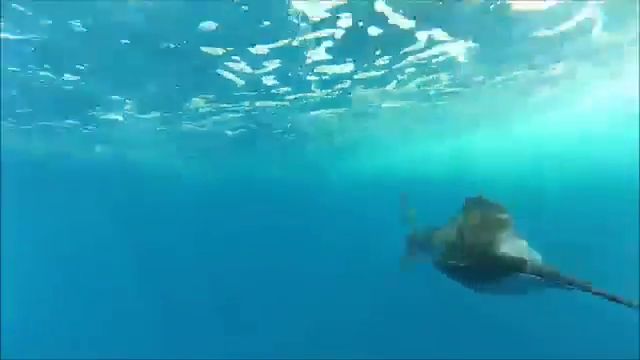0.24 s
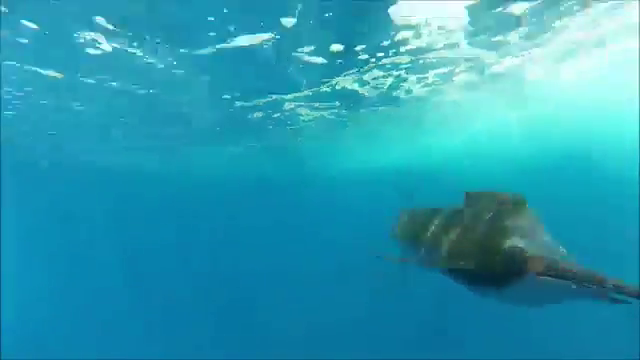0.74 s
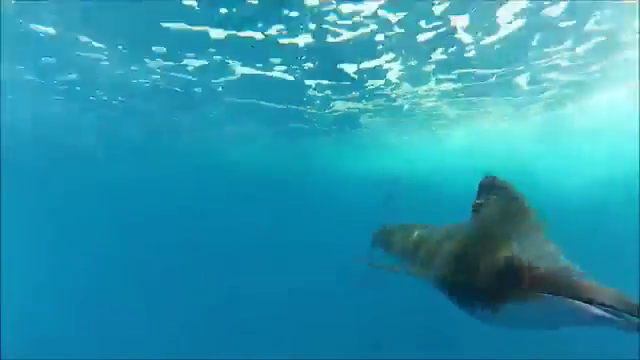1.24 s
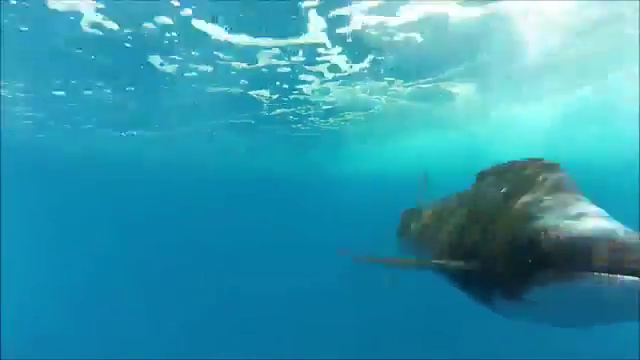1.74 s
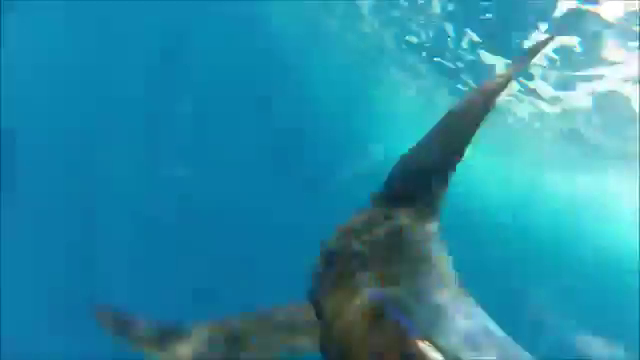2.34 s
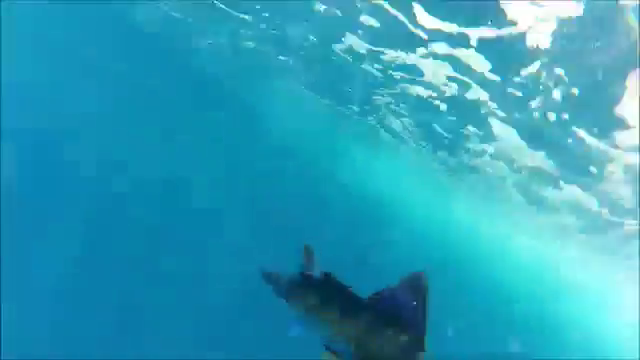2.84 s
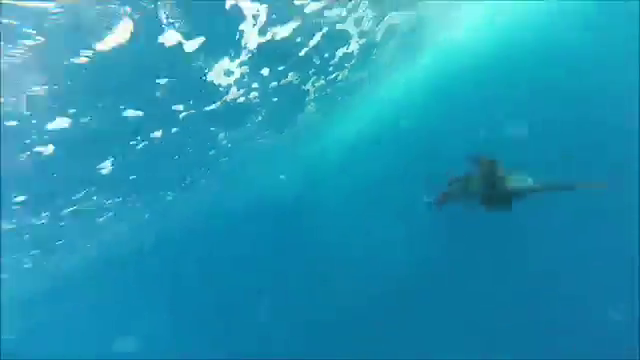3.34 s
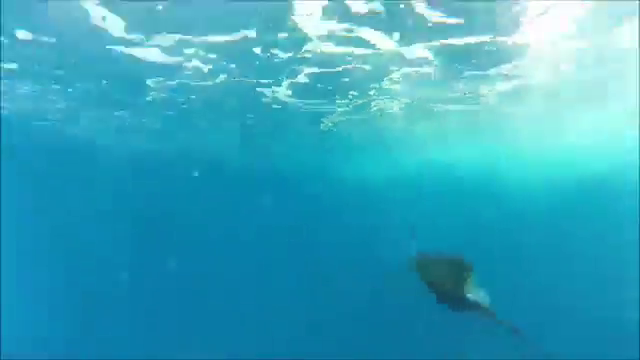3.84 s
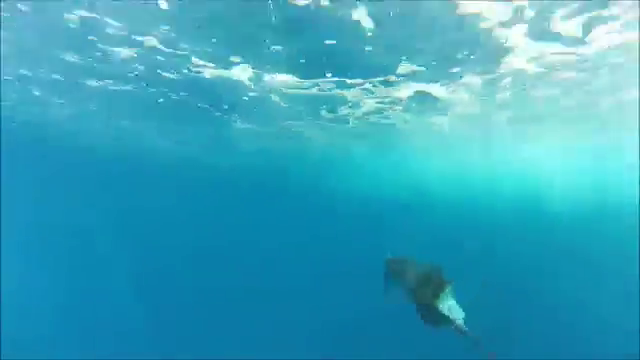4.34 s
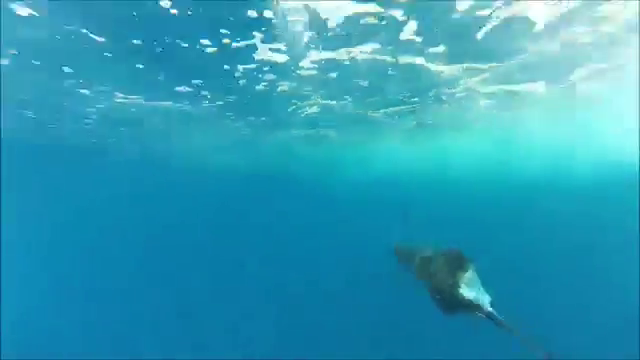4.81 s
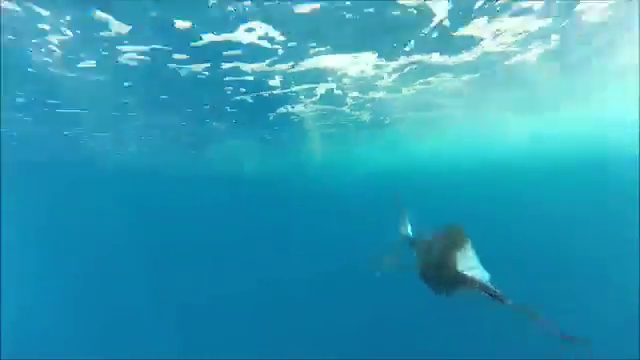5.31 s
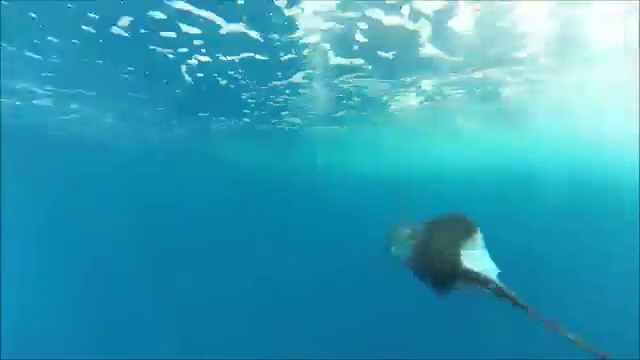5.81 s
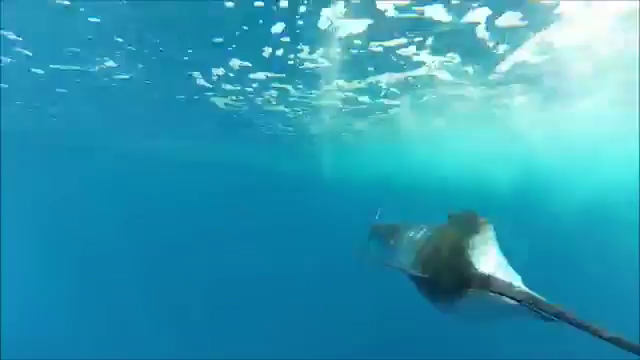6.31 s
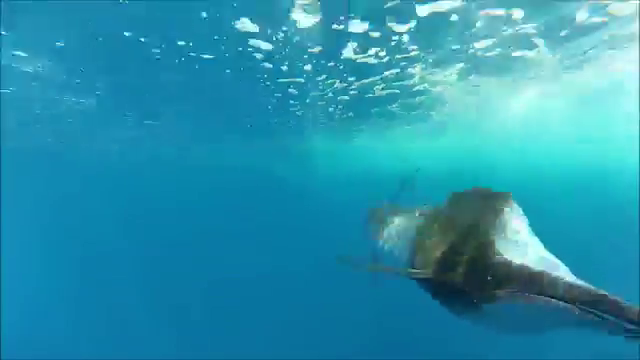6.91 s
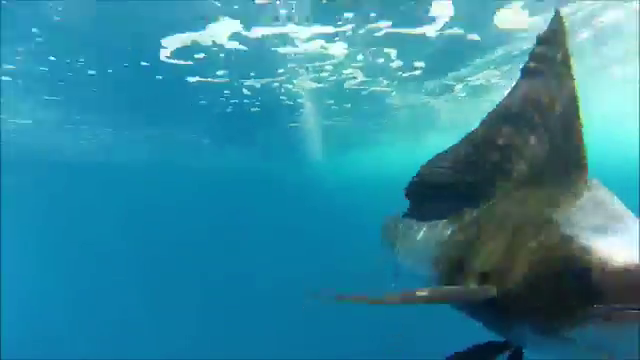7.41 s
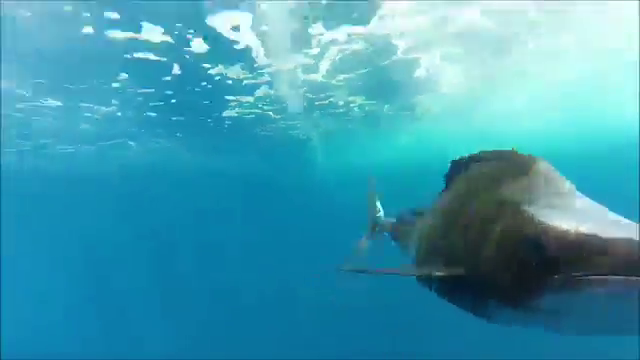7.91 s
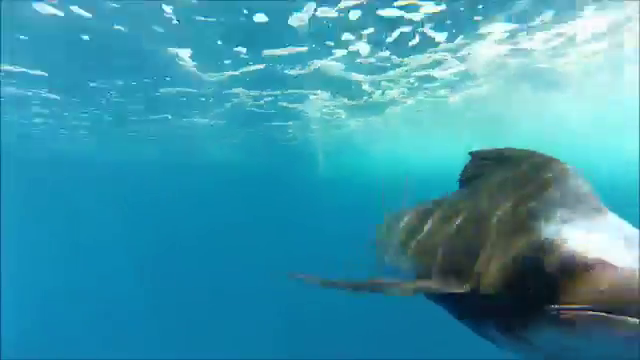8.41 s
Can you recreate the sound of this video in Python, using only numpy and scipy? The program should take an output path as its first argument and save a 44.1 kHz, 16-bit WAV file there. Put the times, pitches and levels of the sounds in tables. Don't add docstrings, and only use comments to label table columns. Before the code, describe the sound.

From 0 s, a sealed camera towed under the surface picks up a very low engine throb, around 50 hertz, swelling in uneven pulses, with a hollow housing hum near 200 hertz coming and going. Lumpy, muffled water buffets the shell, with a thin wash above and faint crackle on the loudest swells. At about 2.2 s a billfish hits the housing: an extremely loud, clipped crack with a fast upward snap, then irregular hard knocks, dull thuds and a light scraping hiss until about 2.4 s. The flow drops away until roughly 2.7 s, leaving low rumble and tiny ticks. Rushing returns, with scattered high bubble pips and little puffs of fizz until about 3.9 s. From then to 8.6 s the drone, hum and gusting flow continue, uneven but unbroken, with no further strikes.

```python
import sys
import numpy as np
from scipy import signal
from scipy.fft import rfft, irfft, next_fast_len
from scipy.io import wavfile
from scipy.ndimage import uniform_filter1d, map_coordinates

SR = 44100
rng = np.random.default_rng(int(sys.argv[2]) if len(sys.argv) > 2 else 0)


def how_loud(loudness_db):
    steps = np.asarray(loudness_db, float) / 20
    return 10 ** steps


def wrap_up_sound(samples):
    columns = np.atleast_2d(samples).T
    tamed = np.clip(columns, -1, 1)
    steps = np.round(tamed * 32767).astype(np.int16)
    wavfile.write(sys.argv[1], SR, steps)


N = 381906

# (start [s], length [s], level [dB], pitch [Hz])
RIG_SWINGS = [(-0.005, .3, -15.5, 47.24), (0.67, .26, -13.5, 47.8), (1.03, .155, -15.5, 50.4),
              (1.3, .17, -15, 50.2), (1.51, .09, -16.5, 51.7), (1.7, .11, -13, 50.4),
              (1.905, .31, -15, 50.1), (2.5, .2, -15, 50.38), (2.79, .155, -15.5, 46.4),
              (3.075, .19, -16.5, 43.75), (3.3, .14, -15, 51.7), (3.485, .21, -15, 50.4),
              (3.87, .34, -13.5, 48.4), (4.225, .16, -15.5, 46.5), (4.43, .23, -13, 48.86),
              (4.75, .32, -16.5, 48.3), (5.1, .11, -14.5, 49.12), (5.245, 0.19, -15, 51.85),
              (5.59, .22, -15, 49.1), (5.835, .13, -20, 53.5), (5.985, .075, -18, 46.6),
              (6.245, .26, -15, 47.8), (6.545, .14, -14, 51.72), (6.705, .1, -15, 50.82),
              (6.85, .29, -13, 48.94), (7.25, .3, -16.5, 52.17), (7.6, .14, -12.5, 51.43),
              (7.9, .13, -16.5, 45.1), (8.09, .2, -17, 48.6), (8.33, .33, -14, 47.96)]
# (start [s], length [s], level [dB], pitch [Hz])
HOUSING_HUM = [(0.065, 0.083, -23, 200.6), (0.269, 0.041, -26, 197.2), (0.332, 0.048, -19, 200.6),
               (0.402, 0.19, -15.5, 200.6), (0.635, 0.055, -22.5, 205.7), (0.742, 0.069, -25, 205.2),
               (0.967, 0.103, -16, 203.5), (1.1, 0.29, -18.5, 201.2), (1.441, 0.026, -25.5, 198.4),
               (1.496, 0.28, -16.5, 203.3), (1.81, 0.45, -19, 201.0), (2.297, 0.037, -20.5, 199),
               (2.788, 0.042, -24, 203.3), (2.934, 0.41, -18, 202.6), (3.363, 0.16, -15, 203.5),
               (3.62, 0.141, -19.5, 196), (3.802, 0.12, -15, 194.9), (3.991, 0.041, -25, 195.8),
               (4.246, 0.175, -20, 199.8), (4.646, 0.3, -21.5, 200.2), (4.986, 0.33, -19, 200.2),
               (5.331, 0.96, -19.5, 201.1), (6.377, 0.059, -23.5, 189), (6.478, 0.123, -16.5, 202),
               (6.845, 0.069, -17.5, 205.1), (6.943, 0.51, -20.5, 198.3), (7.471, 0.23, -17.5, 202.1),
               (7.767, 0.56, -22.5, 202.8), (8.359, 0.061, -22.5, 200.8), (8.624, 0.034, -17.5, 198.5)]
# (pitch [Hz], width [Hz], level [dB])
SKIRTS = [(50, 30, -30.5), (192.2, 33, -30.5), (397.4, 32, -39.5), (24.4, 6.8, -30.5), (915.3, 32, -58.5),
          (2230, 610, -71)]
# (time [s], start pitch [Hz], stiffening [Hz/s], level [dB], t60 [s])
BLOW = [
    (2.21995, 335, 15700, 34, .0125),
    (2.2222, 800, 0, 0, .02),
    (2.2250, 1900, 0, -14, .015),
]
# (time [s], peak [dB], thud re knock [dB], snap re knock [dB])
BOUNCES = [
    (2.2309, -34, 17.5, -23.5),
    (2.2627, -11, 2, -6),
    (2.2968, -26.5, 11.5, -9),
    (2.329, -13.5, 1.5, -13),
    (2.333, -11, -3, -22),
    (2.358, -26.5, -2, -16),
    (2.369, -38.5, 22.5, -10),
    (2.376, -46, 23, 7),
    (2.417, -41, -3.5, -2.5),
]
# (pitch [Hz], level [dB], t60 [s])
SHELL_MODES = [(597, 2, 0.016), (877, 2.5, 0.028), (1216, -6, 0.022), (1570, -3.5, 0.0083),
               (2300, -10, 0.011)]
# (pitch [Hz], level [dB], t60 [s])
THUD_MODES = [(222, 1, 0.043), (425, 0.048, 0.034)]
# (time [s], peak [dB], pitch [Hz])
BUBBLES = [(2.301, -52, 6207), (2.311, -57, 5740), (2.327, -52, 5640), (2.334, -55, 7350),
           (2.36, -49, 5780), (2.398, -47.5, 10570), (2.449, -59, 6276), (2.614, -49.5, 5344),
           (2.636, -52, 5510), (2.71, -51, 7740), (2.716, -52, 8270), (2.737, -56, 6290),
           (2.762, -55, 8270), (2.83, -45.5, 10280), (2.872, -44, 5790), (2.904, -55, 5440),
           (2.919, -43, 5480), (2.927, -56, 4950), (2.941, -43.5, 5710), (2.955, -46, 8690),
           (3.066, -40.5, 7120), (3.145, -44, 10260), (3.249, -38, 7230), (3.257, -57, 7140),
           (3.266, -59, 7350), (3.563, -68, 4840), (3.602, -47, 10130), (3.635, -49.5, 6510),
           (3.832, -38, 4765), (3.838, -41, 8254)]
# (time [s], peak [dB], rise [dB/s], fall [dB/s])
FIZZ = [
    (2.34, -64, 200, 60),
    (2.9, -58.5, 50, 100),
    (3.09, -57.5, 200, 40),
    (3.85, -59, 200, 100),
]
# (time [s], level [dB])
FLOW = [(0.0, -52), (0.24, -56.5), (0.55, -47.5), (0.85, -56.5), (1.15, -50.5), (1.7, -48.5), (2.15, -54),
        (3.0, -48.5), (3.4, -50.5), (3.8, -49), (4.1, -53), (4.6, -55.5), (4.85, -50), (5.8, -51.5),
        (6.28, -46), (6.65, -52), (7.4, -49), (8.66, -54)]
# (time [s], level [dB])
GUSTS = [(0.68, 1), (1.42, -4), (3.2, 3), (3.85, 4), (4.38, 4), (5.35, 2), (6.42, 4), (7.05, -2), (7.28, 2),
         (7.74, -4.5), (7.92, 1.5), (8.3, 4.5)]
# (frequency [Hz], level [dB per Hz])
SURGE_SPECTRUM = [(8, -10), (18, -2), (30, 3.5), (65, 7.5), (90, -6), (160, 1), (240, -2), (310, -12),
                  (400, -11.5), (500, -9.5), (600, -29), (800, -57)]
# (frequency [Hz], level [dB per Hz])
WASH_SPECTRUM = [(400, -27.5), (620, -6.5), (730, 1.5), (850, -5), (925, -3.5), (1060, -12), (1240, -9),
                 (1530, -13), (1950, -22.5), (2240, -23.5), (2600, -28.5), (3500, -30.5), (8000, -41.5),
                 (15000, -48)]
# (first [s], level [dB], steps [count])
GAIN_STEPS = [(0.109, -52, 4), (0.19, -53, 2), (0.437, -43, 1), (0.703, -41, 1), (0.806, -48, 1),
              (1.06, -48, 2), (1.366, -51, 2), (1.543, -50, 1), (1.573, -44, 2), (1.723, -50, 1),
              (2.034, -50, 2), (2.807, -49, 2), (2.989, -48, 1), (3.174, -43, 2), (3.325, -49, 3),
              (3.628, -50, 1), (3.869, -43, 1), (4.449, -49, 3), (5.121, -50, 2), (5.296, -48, 2),
              (5.431, -46, 1), (5.917, -47, 1), (6.326, -49, 2), (6.417, -47.5, 2), (6.578, -42, 1),
              (7.07, -48, 2), (7.505, -49, 2), (7.622, -46.5, 1), (7.945, -49, 2), (8.377, -48, 1)]
# (first [s], steps [count])
FAINT_STEPS = [(0.553, 1), (0.828, 1), (1.225, 2), (1.347, 1), (1.527, 1), (1.743, 1), (1.763, 1),
               (1.918, 2), (1.991, 1), (2.067, 2), (2.937, 1), (3.093, 2), (3.49, 2), (3.913, 1),
               (3.946, 1), (4.0, 1), (4.041, 1), (4.09, 1), (4.26, 2), (4.816, 2), (4.915, 2), (5.608, 2),
               (6.017, 1), (6.272, 2), (6.875, 2), (7.006, 1), (7.569, 1), (7.672, 2), (8.119, 2),
               (8.269, 1)]
# (frequency [Hz], level [dB per Hz])
CRACKLE_SPECTRUM = [(500, -26.5), (1100, 2), (2200, -0.5), (3700, -7.5), (8000, -13.5), (13500, -17.5),
                    (15300, -41.5)]


def unit(x):
    return x / np.sqrt(np.mean(x ** 2) + 1e-20)


def curves(rows):
    s, *cols = np.transpose(rows)
    return [np.interp(np.arange(N) / SR, s, c) for c in cols]


def wobble(rate):
    knots = rng.standard_normal(int(N * rate / SR) + 4)
    return map_coordinates(knots, [np.arange(N) * rate / SR])


def filtered(x, response):
    m = next_fast_len(N + SR // 2)
    return irfft(rfft(x, m) * response(np.fft.rfftfreq(m, 1 / SR)), m)[:N]


def coloured(points):
    f, db = np.transpose(points)

    def response(hz):
        return how_loud(np.interp(np.log(hz + 1), np.log(f), db, -120, -120))

    return unit(filtered(rng.standard_normal(N), response))


def add(track, s, sound):
    part = track[int(round(s * SR)):][:len(sound)]
    part += sound[:len(part)]


def gate(t, length_s, rise_s, fall_s):
    return (1 + np.tanh(t / rise_s)) * (1 - np.tanh((t - length_s) / fall_s)) / 4


def spells(rows, rise_s, fall_s, sag_db_per_s, lift_db, rest_db):
    t = np.arange(0, N / SR, .002)[:, None]
    s, length_s, db, hz = np.transpose(rows)
    middle = s + length_s / 2
    level_db = db + lift_db + sag_db_per_s * np.clip(t - middle, -length_s, length_s)
    gain = np.sum(how_loud(level_db) * gate(t - s, length_s, rise_s, fall_s), axis=1) + how_loud(rest_db)
    return curves(np.c_[middle, hz]) + curves(np.c_[t, gain])


def resonance(spell, waver_hz, flutter_db, rate):
    hz, gain = spell
    phase = 2 * np.pi * np.cumsum(hz + waver_hz * wobble(rate)) / SR
    return np.sqrt(2) * gain * how_loud(flutter_db * wobble(rate)) * -np.cos(phase)


def tow_rig():
    swings = spells(RIG_SWINGS, rise_s=.007, fall_s=.02, sag_db_per_s=-7, lift_db=-2.5, rest_db=-30.5)
    return resonance(swings, waver_hz=2, flutter_db=1.1, rate=18)


def housing(surge_swing_db):
    hum = spells(HOUSING_HUM, rise_s=.017, fall_s=.022, sag_db_per_s=-1.5, lift_db=-3, rest_db=-37)
    return resonance(hum, waver_hz=5, flutter_db=2.5, rate=30) * how_loud(.3 * surge_swing_db)


def drone(surge_db):
    surge_swing_db = surge_db - surge_db.mean()
    x = tow_rig() + housing(surge_swing_db)
    for hz, width, db in SKIRTS:
        def response(f):
            return (f * width / np.hypot(hz * hz - f * f, f * width)) ** 2

        skirt = unit(filtered(rng.standard_normal(N), response))
        x += how_loud(db + (hz > 100) * surge_swing_db) * skirt
    return x


def ring(modes, t):
    return sum(how_loud(db + rng.normal(0, 2.2) - 60 * t / t60) * np.sin(2 * np.pi * hz * t)
               for hz, db, t60 in modes)


def blow(x, t):
    grip = np.exp(-(t / .0082) ** 10)
    for s, hz, stiffen, db, t60 in BLOW:
        cycles = hz * t + stiffen * t * t / 2
        add(x, s, -grip * how_loud(db - 60 * t / t60) * np.sin(2 * np.pi * cycles))


def bounces(x, t):
    snap_band = signal.butter(3, [900, 2800], "band", fs=SR, output="sos")
    for s, db, thud_db, snap_db in BOUNCES:
        snap = signal.sosfilt(snap_band, rng.standard_normal(len(t)))
        knock = ring(SHELL_MODES, t) + how_loud(thud_db) * ring(THUD_MODES, t)
        knock += how_loud(snap_db + 13 - 60 * t / .016) * snap
        add(x, s, how_loud(db) * knock * (1 - np.exp(-t / .00096)))


def scrape():
    since = np.clip(np.arange(N) / SR - BLOW[0][0], 0, None)
    sliding = (since > .026) * (since < .165)
    return sliding * how_loud(-58.5 - 20 * since + 2.4 * wobble(81)) * coloured(CRACKLE_SPECTRUM)


def strike():
    x, t = np.zeros(N), np.arange(SR // 8) / SR
    blow(x, t)
    bounces(x, t)
    return x + scrape()


def pop(hz, t60):
    t = np.arange(SR // 60) / SR
    return how_loud(-60 * t / t60) * (1 - np.exp(-t / .00025)) * np.sin(2 * np.pi * hz * t * (1 + 4.3 * t))


def bubbles():
    x = np.zeros(N)
    for s, db, hz in BUBBLES:
        overtone = .25 * pop(1.6 * hz % 15000, .005)
        add(x, s, how_loud(db + 9) * (pop(hz, .0075) + overtone))
    place, pitches, sizes = rng.random((2600, 3)).T
    when = 2.28 + 1.82 * place
    clouds = sum(how_loud(db - np.maximum(rise * (at - when), fall * (when - at))) for at, db, rise, fall in FIZZ)
    for s, cloud, pitch, size in zip(when, clouds, pitches, sizes):
        add(x, s, cloud * how_loud(-4 * np.log(size + .01)) * pop(4500 * 3.1 ** pitch, .0045))
    return x


def flow():
    t, (flow_db,) = np.arange(N) / SR, curves(FLOW)
    lull = gate(t - 2.39, length_s=.33, rise_s=.04, fall_s=.08)
    flow_db = flow_db - 14.5 * lull + .43 * wobble(5.5)
    gust_s = .07
    flow_db += sum(db * np.exp(-((t - s) / gust_s) ** 2) for s, db in GUSTS)
    surge_over_db, surge_grows = 15.5, 1
    surge_db = flow_db.mean() + surge_over_db + surge_grows * (flow_db - flow_db.mean())
    return surge_db, flow_db


def water(surge_db, wash_db):
    eddy = wobble(14)
    surge = how_loud(surge_db + 12 + 2.2 * eddy + 1.4 * wobble(45)) * coloured(SURGE_SPECTRUM)
    wash = how_loud(wash_db + 1 + 1.3 * eddy + 1.3 * wobble(70)) * coloured(WASH_SPECTRUM)
    return surge + wash


def steps(x):
    gap_s, loss_db, faint_db, stray_db = .011, 4, -54, -52
    rows = GAIN_STEPS + [(s, faint_db, count) for s, count in FAINT_STEPS]
    runs = [(s + k * gap_s, db - k * loss_db) for s, db, count in rows for k in range(int(count))]
    tall = signal.find_peaks(np.abs(x[SR // 50:]), height=.3, distance=SR // 100)[0] / SR + .02
    luck = rng.exponential(size=N // 100)[(tall * 400).astype(int)]
    clear_of_runs = np.abs(tall[:, None] - np.array(runs)[:, 0]).min(axis=1) > .008
    clear_of_strike = np.abs(tall - 2.45) > .3
    free = clear_of_runs & clear_of_strike & (luck > 2.3)
    return runs + [(s, stray_db) for s in tall[free]]


def gain_control(x):
    t, after = np.arange(-SR // 100, SR // 100) / SR, np.arange(SR // 4) / SR
    crackle, swell, duck_db = np.zeros(N), np.zeros(N), np.zeros(N)
    for s, db in steps(x):
        add(crackle, s + t[0], how_loud(db + 3.3) * np.exp(-(t / np.where(t < 0, .0008, .002)) ** 2))
        peak = np.sign(x[round(s * SR)]) * how_loud(.65 * db + 12.5)
        add(swell, s + t[0], peak * np.exp(-(t / .0012) ** 2))
        halo = how_loud(-50.5 - 20 + .33 * (db + 52.5))
        add(crackle, max(s - .06, 0), halo * np.exp(-((after - .06) / .02) ** 2))
        dip = (1 - np.exp(-after / .0029)) * np.exp(-after / .093)
        add(duck_db, s, -.22 * max(db + 59, 0) * dip)
    limit_db, limit_s, limit_share = -14.5, .04, .45
    power = uniform_filter1d(np.clip(x, -.5, .5) ** 2, round(limit_s * SR))
    duck_db -= limit_share * np.maximum(10 * np.log10(np.abs(power) + 1e-9) - limit_db, 0)
    return (x + swell) * how_loud(duck_db + 1.5), crackle


def peak_crackle(x):
    tall = np.clip(np.abs(x), 0, .45)
    tops = signal.find_peaks(tall, distance=SR // 130)[0]
    ticks = np.zeros(N)
    ticks[tops] = how_loud(-44 + rng.normal(0, 4, N)[tops]) * tall[tops] ** 1.8
    return np.convolve(ticks, np.hanning(SR // 500), "same") + how_loud(-50) * tall ** 11 + how_loud(-80.5)


def scene():
    surge_db, wash_db = flow()
    return (drone(surge_db) + strike() + bubbles() + water(surge_db, wash_db))[None]


def roll_off(x):
    return signal.sosfilt(signal.butter(12, 15810, fs=SR, output="sos"), x)


def record(dry):
    x, crackle = gain_control(dry[0])
    crackle += peak_crackle(x)
    mix = np.clip(x + crackle * coloured(CRACKLE_SPECTRUM), -.98, .98)
    return roll_off(mix[None])


dry = scene()
out = record(dry)
wrap_up_sound(out)
```